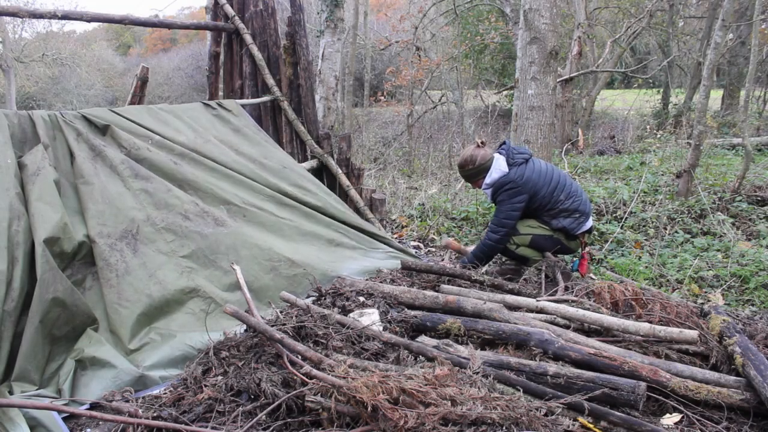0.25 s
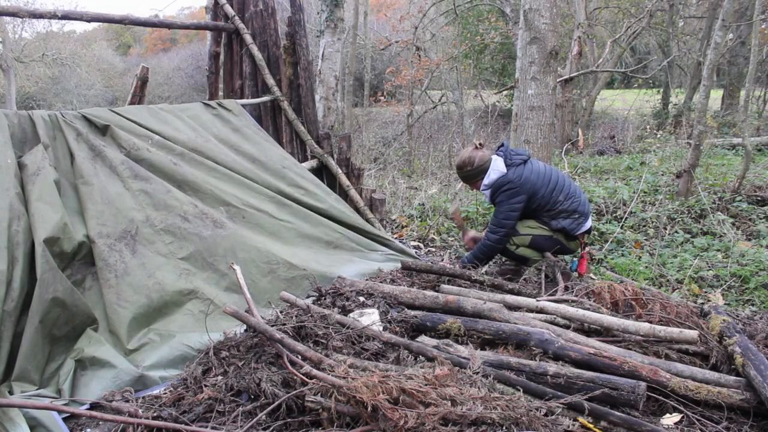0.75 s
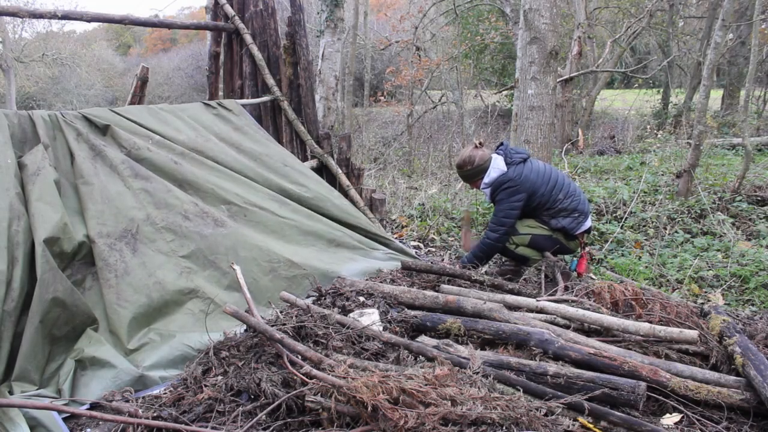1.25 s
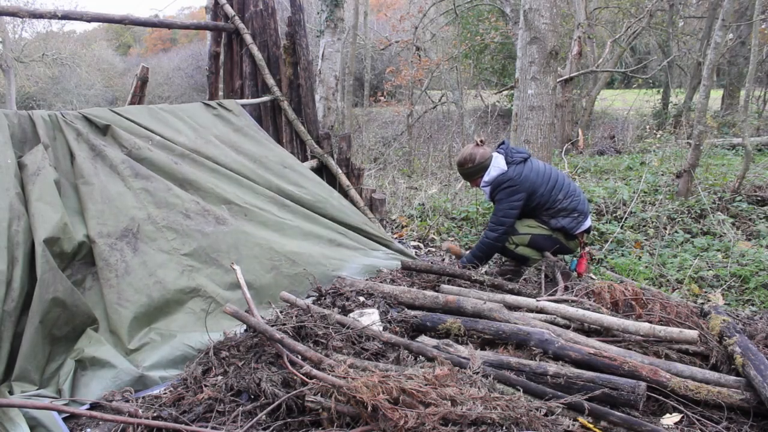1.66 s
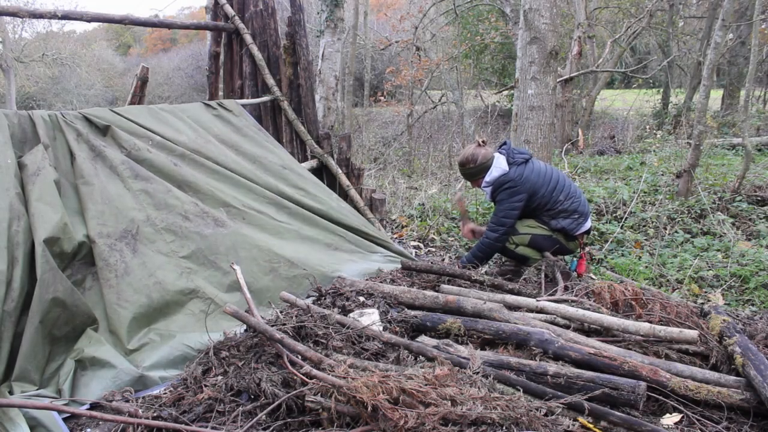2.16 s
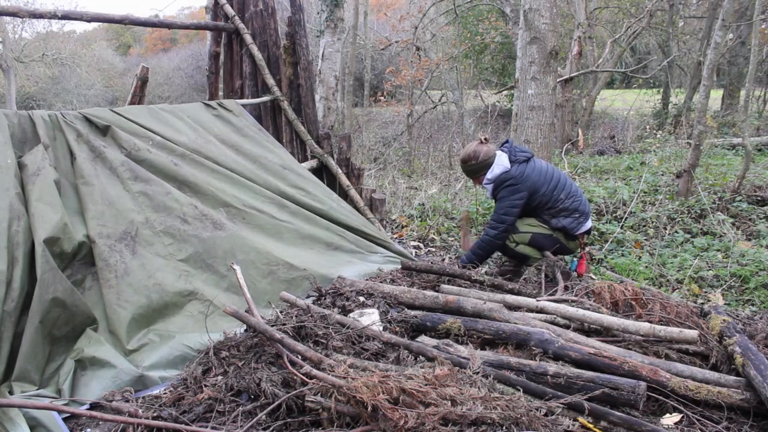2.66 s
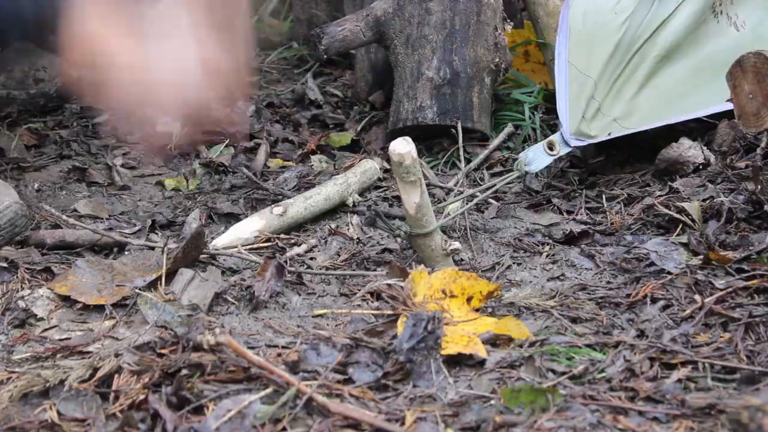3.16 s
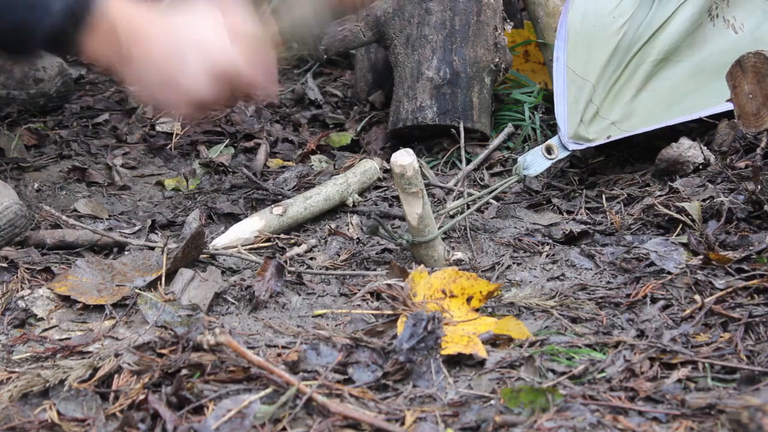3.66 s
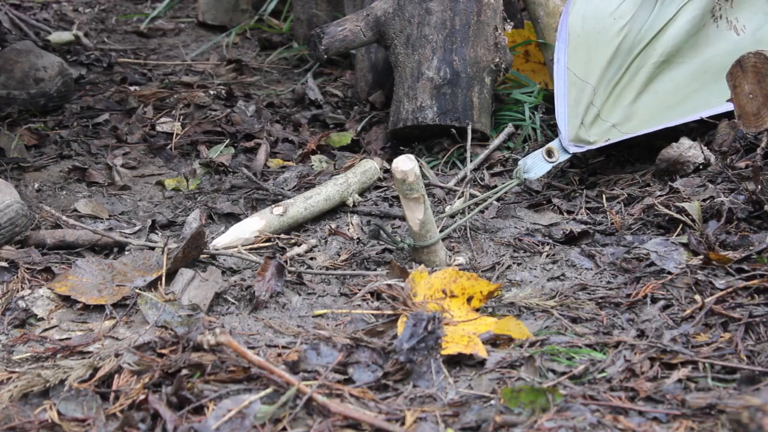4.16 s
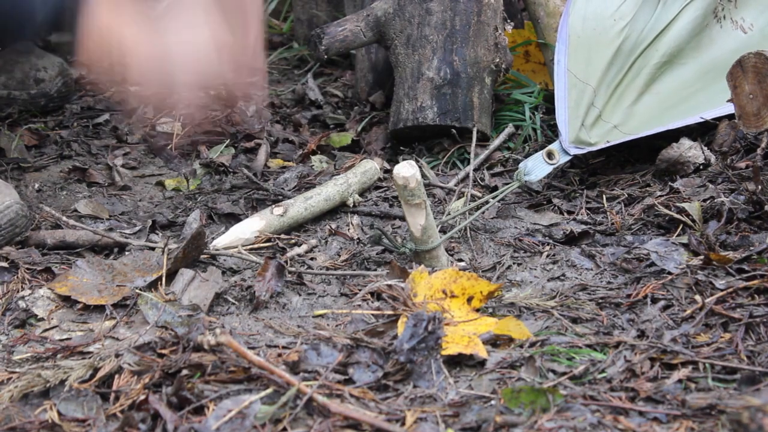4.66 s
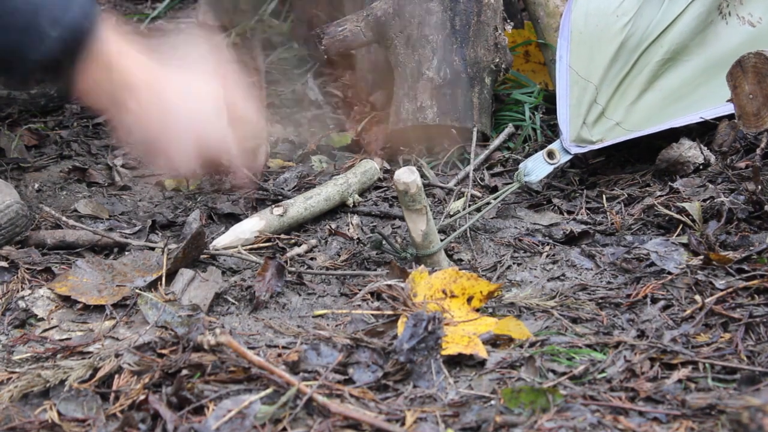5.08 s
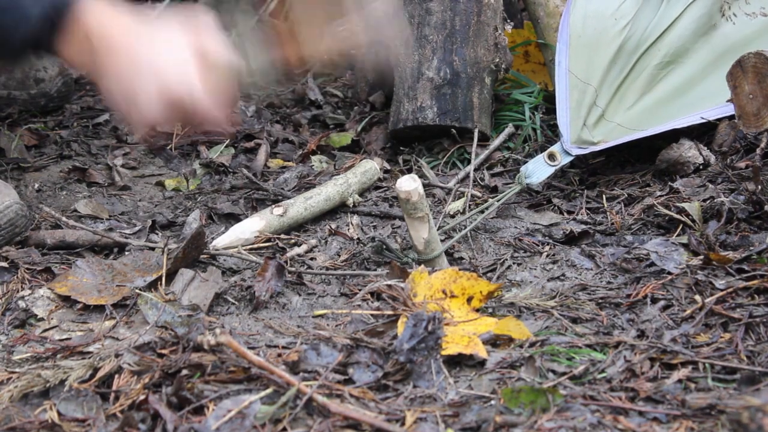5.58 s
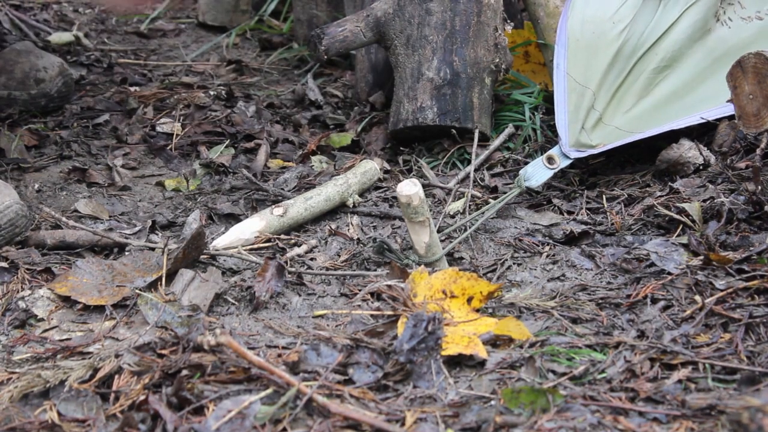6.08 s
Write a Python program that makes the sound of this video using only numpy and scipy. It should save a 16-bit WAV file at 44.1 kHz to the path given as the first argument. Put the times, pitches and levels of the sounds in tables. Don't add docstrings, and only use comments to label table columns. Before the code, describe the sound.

Steady single wooden knocks, eight distant then nine close. The far ones are bright, hollow and short, with an airy outdoor tail, over low wind rumble, faint traffic hum, thin bird seeps and a harsh churr. After an abrupt cut the microphone is beside the peg; blows hit hard enough to clip, with small twig ticks and jacket rustle, the last two weaker and duller.

```python
import sys
import numpy as np
from scipy import signal
from scipy.fft import rfft, irfft
from scipy.io import wavfile
from scipy.ndimage import uniform_filter1d

SR = 44100
rng = np.random.default_rng(int(sys.argv[2]) if len(sys.argv) > 2 else 0)


def decibels_to_gain(level_db):
    exponent = np.asarray(level_db, float) / 20
    return 10 ** exponent


def dump_mix(stems):
    frames = np.atleast_2d(stems).T
    limited = np.clip(frames, -1, 1)
    pcm = np.round(limited * 32767).astype(np.int16)
    wavfile.write(sys.argv[1], SR, pcm)


N = 279153
CUT_S = 2.977


def unit(x):
    return x / np.sqrt(np.mean(x ** 2))


def band(x, lo_hz, hi_hz):
    edges_hz = [lo_hz, min(hi_hz, 0.45 * SR)]
    return signal.sosfilt(signal.butter(2, edges_hz, "bandpass", fs=SR, output="sos"), x)


def coloured(spectrum):
    hz, db = np.transpose(spectrum)
    f = np.arange(1, N // 2 + 2) * SR / N
    gain = decibels_to_gain(np.interp(np.log(f), np.log(hz), db, -90, -90))
    return unit(irfft(rfft(rng.standard_normal(N)) * gain, N))


def walk(rate_hz):
    hold = int(SR / rate_hz)
    steps = np.repeat(rng.standard_normal(N // hold + 1), hold)[:N]
    return unit(uniform_filter1d(steps, hold))


def curve(table, column):
    rows = np.array(table)
    return np.interp(np.arange(N) / SR, rows[:, 0], rows[:, column])


def add(track, s, sound):
    i = int(s * SR)
    track[i:i + len(sound)] += sound[:N - i]


def fade(t, t60):
    return np.exp(-np.log(1000) * t / t60)


def swell(t, rise_s, fall_s):
    return np.exp(-(t / np.where(t < 0, rise_s, fall_s)) ** 2)


def ring(t, modes):
    return sum(decibels_to_gain(db) * np.sin(2 * np.pi * hz * t) * fade(t, t60) for hz, db, t60 in modes)


def woods(table, ring_hz, ring_db, treble_db):
    t, out = np.arange(SR // 2) / SR, 0
    for hz, early_db, early_t60, late_db, late_t60 in table:
        noise = unit(band(rng.standard_normal(len(t)), hz / 1.427, hz * 1.237))
        noise = noise * decibels_to_gain(treble_db * np.clip(hz / 9000, 0, 1))
        early = decibels_to_gain(early_db) * fade(t, early_t60)
        late = decibels_to_gain(late_db) * fade(t, late_t60)
        out = out + noise * (early + late)
    for hz, db in zip(ring_hz, ring_db):
        out = out + decibels_to_gain(db) * band(out, hz * 0.91, hz * 1.074)
    return out * np.clip(t / 0.00035, 0, 1)


# (time [s], road hum [dB], port wind [dB])
AIR_LEVELS = [(0.0, -45, -42), (0.25, -45.5, -39), (0.49, -42, -42), (0.67, -45.5, -42.5),
              (1.53, -45, -44.5), (2.34, -47.5, -47), (2.75, -45.5, -44.5), (3.0, -48.5, -48.5),
              (3.51, -46.5, -45.5), (3.85, -50, -51), (4.28, -47, -46.5), (4.93, -53, -50.5),
              (5.38, -49.5, -46.5), (5.85, -54, -54.5), (6.33, -53.5, -58)]
# (frequency [Hz], level [dB per Hz])
FAR_HUM = [(88, -33), (150, 5), (221, -5.5), (263, -5.5), (296, -3), (404, -2.5), (912, 0), (1170, -2.5),
           (1270, -4.5), (2100, -13), (2360, -13.5), (3410, -18), (3760, -16), (13000, -37.5),
           (15500, -52.5)]
# (frequency [Hz], level [dB per Hz])
NEAR_HUM = [(88, -17.5), (150, -3), (490, -12.5), (827, -8), (1040, -8.5), (1200, -9), (1980, -18),
            (2180, -18.5), (2700, -21), (3830, -26), (6730, -25), (8330, -31), (15500, -58)]


def road_hum():
    level = decibels_to_gain(curve(AIR_LEVELS, column=1) + 0.5 + 0.21 * walk(6.9))
    is_far = np.arange(N) < CUT_S * SR
    return level * np.where(is_far, coloured(FAR_HUM), coloured(NEAR_HUM))


# (frequency [Hz], level [dB per Hz])
WIND_COLOUR = [(12, -43), (20, -35.5), (32, -7.5), (52, 1), (70, 9), (236, -15.5), (253, -11.5), (300, -32),
               (390, -62), (660, -120)]
# (time [s], peak [dB], pitch [Hz])
SLAPS = [(0.077, -22.5, 59.6), (0.105, -20.5, 113), (0.1282, -8, 104), (0.261, -19.5, 88), (0.358, -29, 71),
         (0.389, -29, 80), (0.444, -28, 80), (0.499, -28, 80.6), (0.528, -20, 61), (0.613, -23, 111)]


def port_wind():
    rumble = decibels_to_gain(curve(AIR_LEVELS, column=2) + 1.5 * walk(14)) * coloured(WIND_COLOUR)
    t, slaps = np.arange(SR // 20) / SR, np.zeros(N)
    for s, db, hz in SLAPS:
        push = np.tanh(1.6 * np.sin(2 * np.pi * hz * t))
        add(slaps, s, decibels_to_gain(db - 0.5) * push * np.exp(-((t * hz - 0.6) / 0.38) ** 2))
    return rumble + slaps


# (time [s], length [s], start pitch [Hz], end pitch [Hz], level [dB])
SEEPS = [
    (.35, .08, 1500, 1300, -52),
    (.42, .09, 1600, 1500, -52),
    (.098, .06, 8350, 7900, -58),
    (.222, .05, 8100, 8100, -59),
    (1.44, .1, 6800, 6500, -67),
    (1.57, .09, 6500, 6250, -67),
]


def seeps():
    out = np.zeros(N)
    for s, length, start_hz, end_hz, db in SEEPS:
        top_hz = start_hz * 1.025
        u = np.linspace(0, 1, int(length * SR))
        arch = np.interp(u, [0, 0.35, 1], [start_hz, top_hz, end_hz])
        breath = 0.13 * top_hz * uniform_filter1d(rng.standard_normal(len(u)), size=40)
        tone = np.sin(2 * np.pi * np.cumsum(arch + breath) / SR)
        add(out, s, decibels_to_gain(db) * np.sin(np.pi * u) * tone)
    return out


# (time [s], length [s], level [dB])
CHUCKS = [(0.173, 0.044, -57.5), (0.244, 0.049, -54)]
# (time [s], length [s], level [dB])
CHURR = [(0.42, 0.029, -57), (0.46, 0.02, -52), (0.49, 0.024, -52.5), (0.544, 0.035, -53),
         (0.589, 0.032, -50.5), (0.628, 0.032, -48.5), (0.724, 0.024, -56), (0.767, 0.025, -53),
         (0.824, 0.038, -54), (.875, 0.062, -54), (0.938, 0.076, -50.5), (1.078, 0.053, -56),
         (1.143, 0.077, -53), (1.225, 0.11, -51), (1.317, 0.1, -52.5)]


def churr():
    out = np.zeros(N)
    notes = [(*row, 2650, -20, 0) for row in CHUCKS]
    for s, length, db in CHURR:
        late_s = max(s - 0.8, 0)
        notes.append((s, length, db, 3630 + 920 * late_s, -5 + 15.5 * late_s, 710 * late_s))
    for s, length, db, hz, high_db, wide_hz in notes:
        u = np.linspace(0, 1, int(length * SR))
        clicks = np.sin(np.pi * 330 * length * u) ** 2
        buzz = clicks * (0.23 + 1.8 * rng.standard_normal(len(u)))
        low = unit(band(buzz, hz * 0.916, hz * 1.07))
        high = unit(band(buzz, hz * 1.34 - wide_hz, hz * 1.55 + wide_hz))
        add(out, s - length / 2, decibels_to_gain(db) * np.sin(np.pi * u) * (low + decibels_to_gain(high_db) * high))
    return out


def birds():
    calls = seeps() + churr()
    return calls + 0.1 * signal.fftconvolve(calls, woods(FAR_WOODS, [], [], 0))[:N]


# (time [s], peak [dB], pitch [Hz])
TICKS = [
    (0.65, -14.5, 7260),
    (2.696, -47, 6500),
    (3.1162, -26, 7800),
    (4.0113, -35, 7400),
    (4.624, -44, 5600),
    (4.791, -31, 6750),
]


def ticks():
    t, out = np.arange(SR // 40) / SR, np.zeros(N)
    for s, db, hz in TICKS:
        noise = rng.standard_normal(len(t))
        snap = unit(band(noise, hz * 0.75, hz))
        tap = 0.88 * unit(band(noise, 900, 2600))
        add(out, s, decibels_to_gain(db) * (snap + tap) * fade(t, 0.012))
    return out


# (frequency [Hz], level [dB per Hz])
CLOTH = [(880, -23), (1500, -9), (3310, -8.5), (3540, -4), (4270, -7.5), (5890, -4), (7450, -4),
         (12400, -29.5), (15500, -47)]
# (lift peak before blow [s], lift level [dB], downswing peak before blow [s], downswing level [dB])
STROKES = [(0.22, -52, 0.042, -50), (0.2, -54, .065, -43), (0.2, -52, 0.078, -50), (.2, -54, .065, -52),
           (.21, -53.5, 0.053, -47), (0.21, -54, 0.057, -55), (0.27, -61.5, 0.038, -57),
           (.3, -60.5, 0.04, -52.5), (0.24, -64.5, 0.042, -54.5)]


def sleeve():
    t, rub = np.arange(N) / SR, decibels_to_gain(-84)
    for s, (lift_s, lift_db, swing_s, swing_db) in zip(NEAR_TIMES, STROKES):
        rub = rub + decibels_to_gain(lift_db) * swell(t - s + lift_s, rise_s=0.09, fall_s=0.061)
        rub = rub + decibels_to_gain(swing_db) * swell(t - s + swing_s, rise_s=0.034, fall_s=0.082)
    flutter = decibels_to_gain(4.0 + 1.28 * walk(80))
    return (t >= CUT_S) * rub * flutter * coloured(CLOTH)


# (multiple of peg pitch [ratio], level [dB], t60 [s])
PEG = [(0.999, 6, 0.011), (2.45, -13, 0.011)]


def blows(times, table, baton, scatter, crack_db, crack_step_db, low_db, low_step_db, sign, rise_s,
          bounce_s, bounce_db, top_hz, high_db, thump_db):
    t, out, clicks = np.arange(SR // 10) / SR, np.zeros(N), np.zeros(N)
    high_ring_hz = 3167
    sunk = np.arange(len(table))
    cracks_db, lows_db = crack_db + crack_step_db * sunk, low_db + low_step_db * sunk
    for s, (db, hz, peg_db, ring_db), crack_db, low_db in zip(times, table, cracks_db, lows_db):
        modes = []
        for mode_hz, mode_db, t60 in baton:
            shift, weight_db = rng.standard_normal(2) * [0.015, 0.7]
            modes.append((mode_hz * (1 + shift), mode_db + weight_db + low_db * (mode_hz < 1200), t60))
        wood = ring(t, modes + [(high_ring_hz, high_db + ring_db, 0.013)])
        peg = decibels_to_gain(peg_db) * ring(t, [(hz * k, d, t60) for k, d, t60 in PEG])
        body = (wood + peg) * np.clip(t / rise_s, 0, 1)

        hiss = band(band(rng.standard_normal(len(t)), 1600, top_hz), 2900, top_hz)
        crack = decibels_to_gain(crack_db) * unit(hiss) * (fade(t, 0.0053) + 0.32 * fade(t, 0.013))
        thump = decibels_to_gain(thump_db) * np.sin(2 * np.pi * 170 * t) * fade(t, 0.021) * np.clip(t / 0.0025, 0, 1)
        knock = sign * decibels_to_gain(db) * (body / np.abs(body).max() + crack + thump)
        add(out, s, knock)
        add(out, s + bounce_s, decibels_to_gain(bounce_db) * knock)

        touch = rng.standard_normal(len(t)) * fade(t, 0.0012)
        add(clicks, s, decibels_to_gain(db + crack_db - 15.5) * touch)
        tint_db = [peg_db - 18.5, ring_db - 0.5, low_db - 19.5]
        wash = woods(scatter, [hz, high_ring_hz, 800], tint_db, crack_db - cracks_db.mean())
        add(out, s, decibels_to_gain(db) * wash)
    return band(clicks, 9100, 14500) + band(out, 70, top_hz * 0.68)


FAR_TIMES = [.2822, .6434, .9991, 1.3465, 1.7012, 2.0539, 2.3955, 2.7469]
# (strength [dB], peg pitch [Hz], peg level [dB], high ring [dB])
FAR_BLOWS = [
    (-2.5, 1100, 10, -4.5),
    (-4, 1050, 5.5, -10),
    (-4.5, 1030, 0.5, -10),
    (-2.5, 1064, 2.5, -15.5),
    (-1.5, 1130, 4, -8),
    (-4, 1080, 1.5, -5.5),
    (-3, 1084, 6.5, -14.5),
    (-3.5, 1080, 6.5, -24),
]
# (frequency [Hz], level [dB], t60 [s])
FAR_BATON = [(400, -12, .025), (770, -3, .035), (1340, -4, .018), (2070, -4, .012), (2600, -6, .012),
             (4600, -6, .008)]
# (frequency [Hz], early level [dB], early t60 [s], late level [dB], late t60 [s])
FAR_WOODS = [(334, -24, 0.089, -48.5, 0.2), (685, -17.5, 0.077, -66.5, 0.26),
             (1144, -15, 0.083, -38.5, 0.6), (2410, -8, 0.016, -34, 0.25), (3330, -23, 0.082, -41, 0.58),
             (6500, -22.5, 0.087, -43.5, 0.6), (11150, -38, 0.022, -63, 0.09)]


def far_blows():
    return blows(FAR_TIMES, FAR_BLOWS, FAR_BATON, FAR_WOODS, crack_db=-8.5, crack_step_db=0.73,
                 low_db=7, low_step_db=-1.2, sign=-0.98, rise_s=0.00033, bounce_s=0.0048,
                 bounce_db=-12.5, top_hz=8800, high_db=11, thump_db=-11)


NEAR_TIMES = [3.2219, 3.6036, 3.9834, 4.3666, 4.7486, 5.1317, 5.5105, 5.8921, 6.2736]
# (strength [dB], peg pitch [Hz], peg level [dB], high ring [dB])
NEAR_BLOWS = [
    (9.9, 1236, -0.5, 0.5),
    (9.1, 1297, 0, -0.5),
    (8.1, 1266, -0.5, -29),
    (11.2, 1275, -2, -11.5),
    (10.3, 1237, -2.5, -24),
    (8.7, 1820, -4.5, 6),
    (9.3, 1780, -2, 4.5),
    (5.7, 1235, -16, -6.5),
    (5.8, 980, -17.5, -25),
]
# (frequency [Hz], level [dB], t60 [s])
NEAR_BATON = [(703, -18.5, 0.027), (816, -7.5, 0.014), (1030, 4, 0.014), (1124, 0, 0.015),
              (1797, 1.5, 0.012), (2240, -0.5, 0.0068), (4270, -31.5, 0.014), (5600, -0.5, 0.0028)]
# (frequency [Hz], early level [dB], early t60 [s], late level [dB], late t60 [s])
NEAR_WOODS = [(273, -40.5, 0.051, -50.5, 0.19), (754, -26.5, 0.032, -47, 0.18),
              (1334, -23.5, 0.047, -44.5, 0.4), (2295, -20, 0.025, -60.5, 0.85),
              (3630, -32.5, 0.025, -58.5, 0.31), (6500, -18, 0.018, -53, 0.2),
              (10700, -28.5, 0.023, -77, 0.45)]


def near_blows():
    return blows(NEAR_TIMES, NEAR_BLOWS, NEAR_BATON, NEAR_WOODS, crack_db=-12.5, crack_step_db=-1.23,
                 low_db=-8, low_step_db=1.1, sign=1, rise_s=0.00109, bounce_s=0.001358,
                 bounce_db=-7, top_hz=10000, high_db=-12, thump_db=-21)


def scene():
    background = road_hum() + port_wind() + birds()
    mix = background + ticks() + sleeve() + far_blows() + near_blows()
    return mix[None]


def top_cut(x):
    return signal.sosfilt(signal.butter(12, 16450, fs=SR, output="sos"), x)


def record(dry):
    clipped = np.clip(dry, -0.96, 0.96)
    smooth = signal.sosfilt(signal.cheby2(8, 50, 17000, fs=SR, output="sos"), clipped)
    return top_cut(smooth)


dry = scene()
out = record(dry)
dump_mix(out)
```